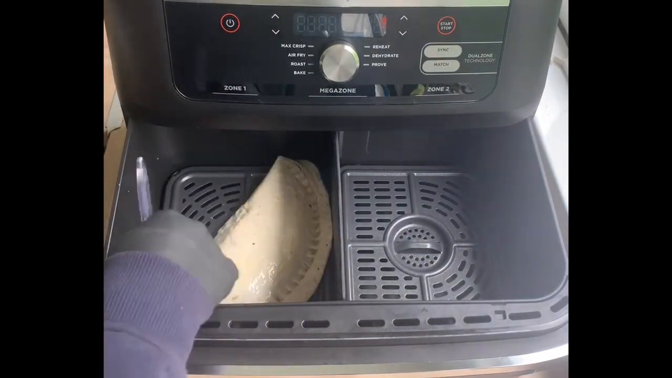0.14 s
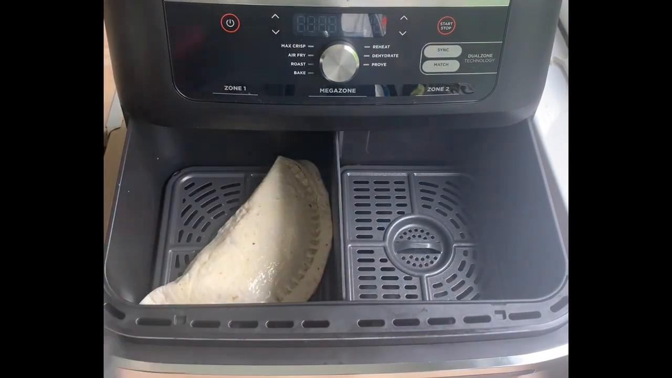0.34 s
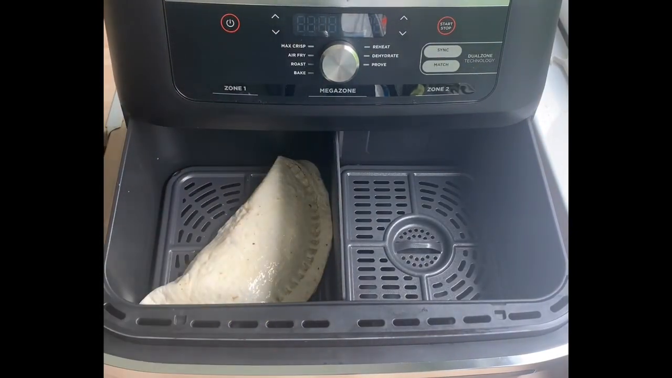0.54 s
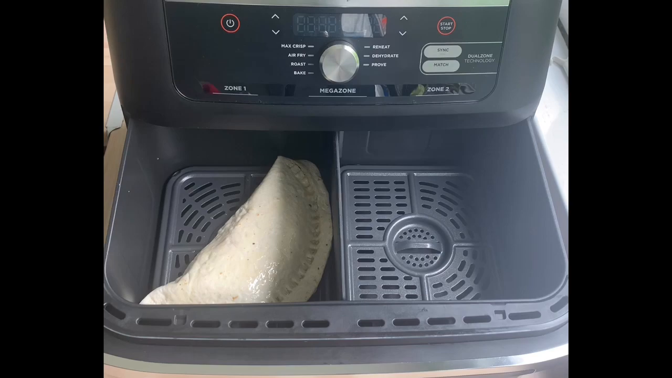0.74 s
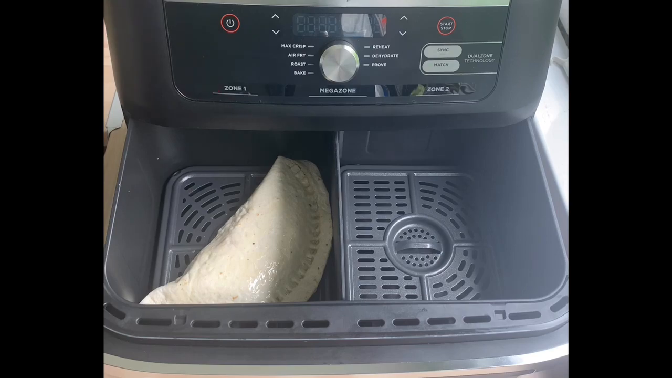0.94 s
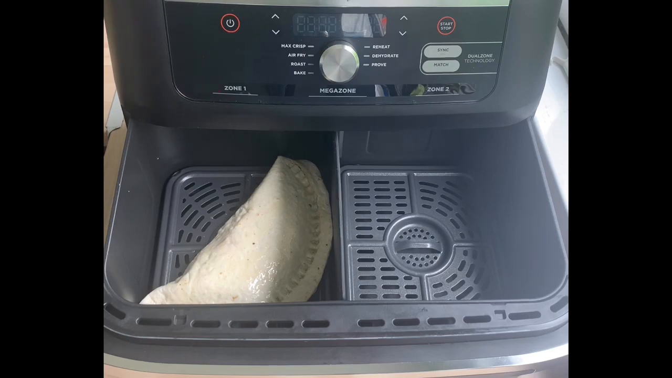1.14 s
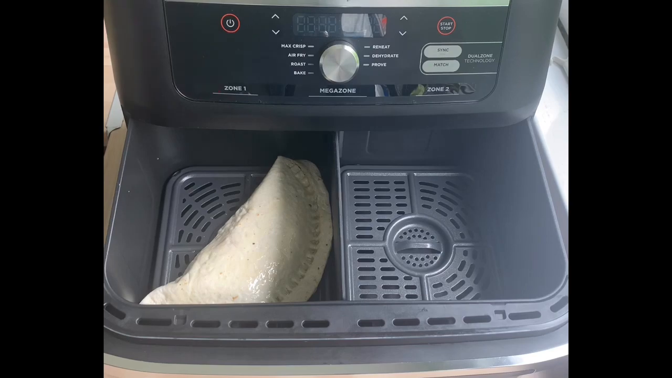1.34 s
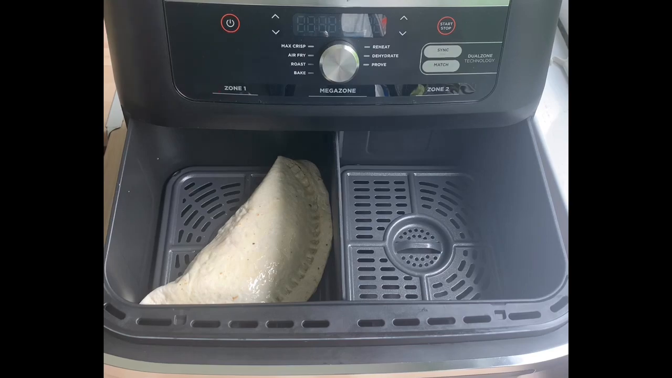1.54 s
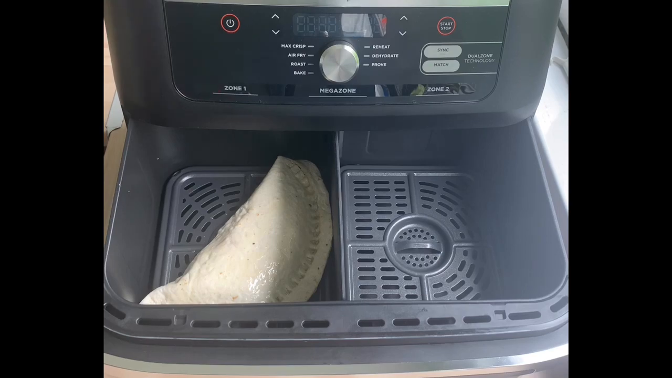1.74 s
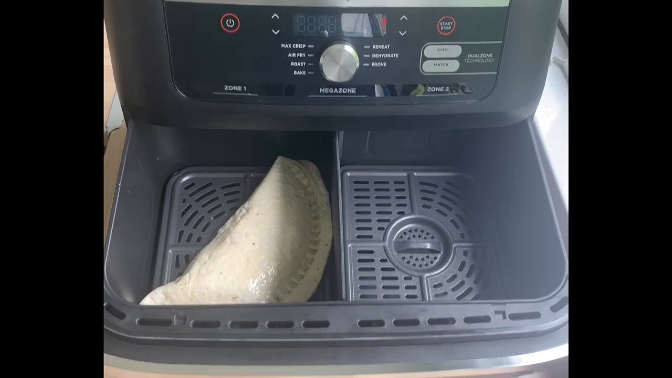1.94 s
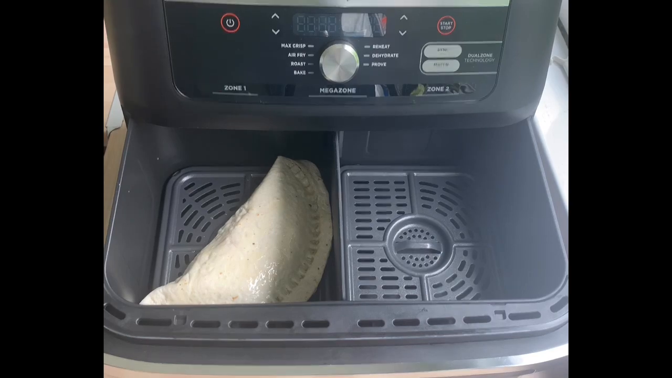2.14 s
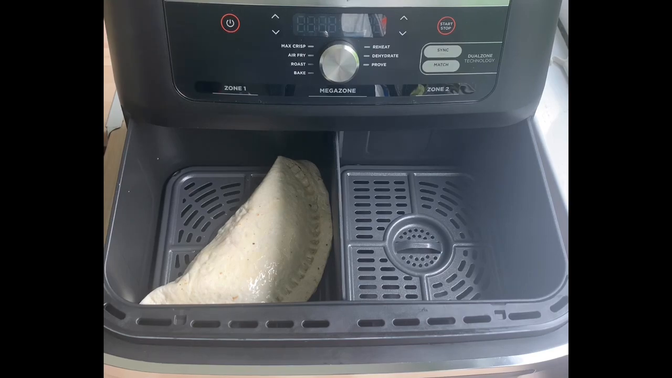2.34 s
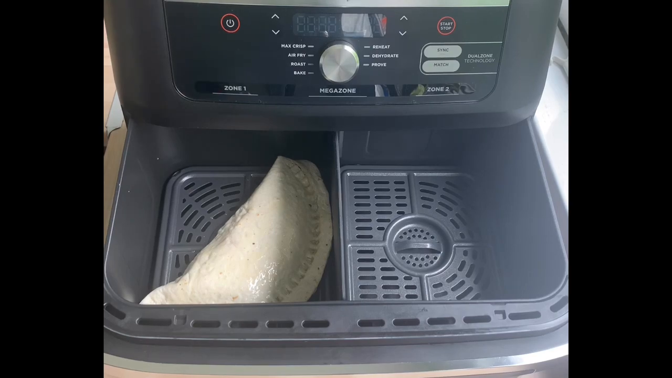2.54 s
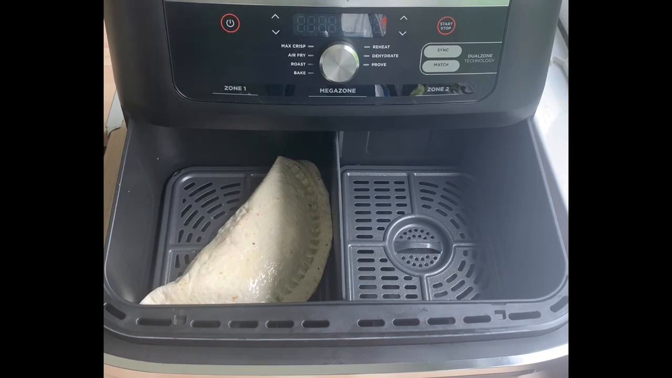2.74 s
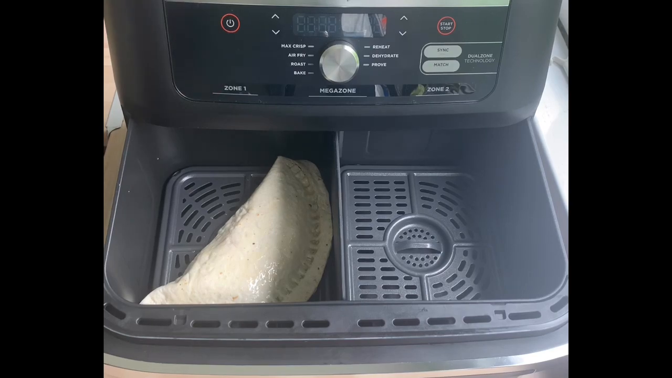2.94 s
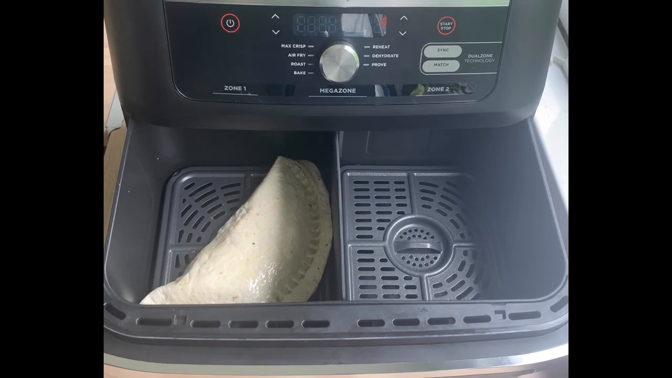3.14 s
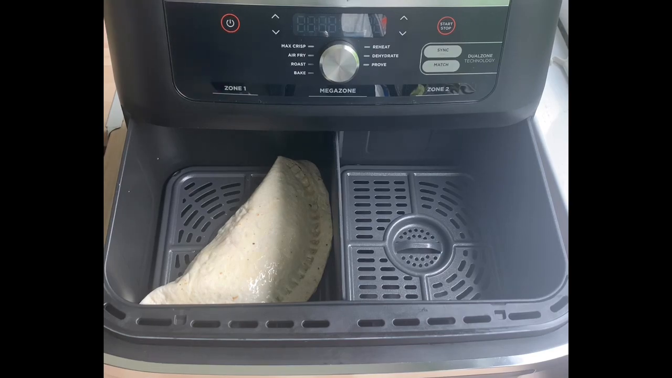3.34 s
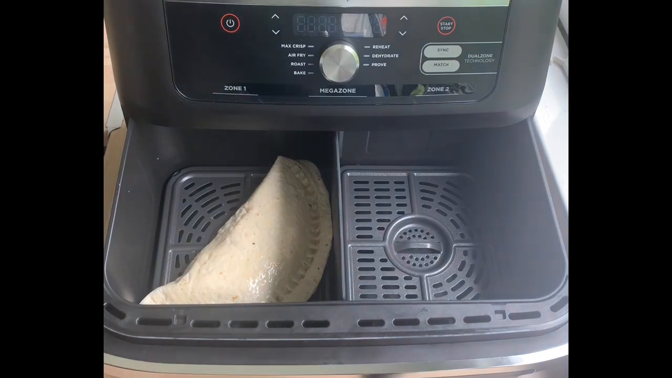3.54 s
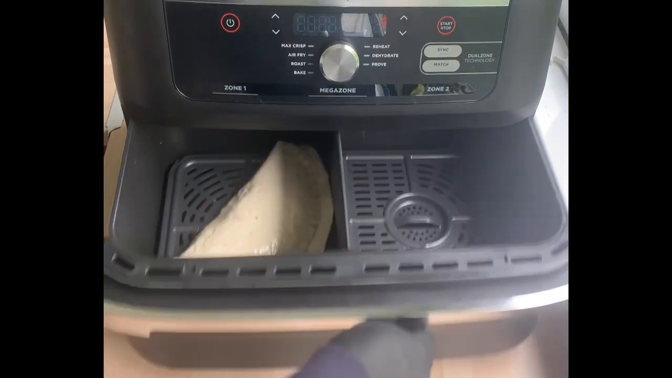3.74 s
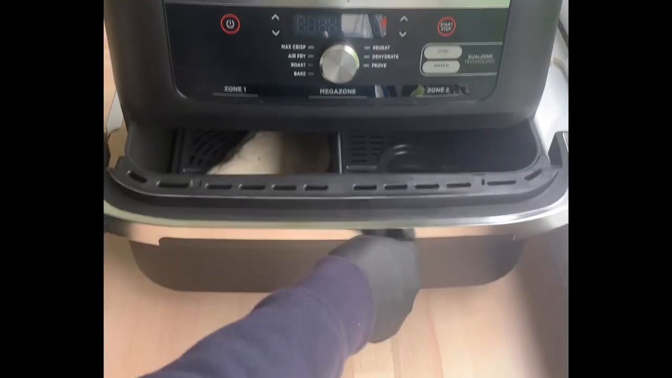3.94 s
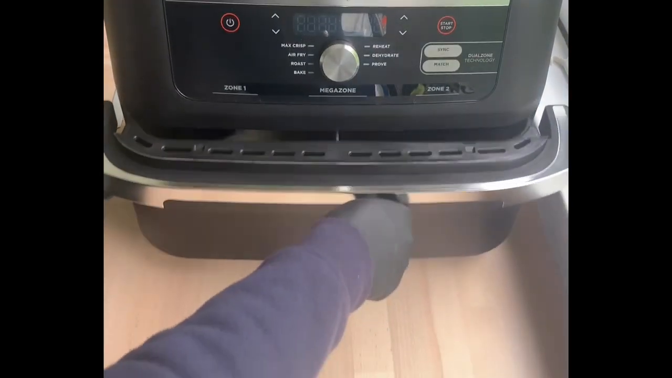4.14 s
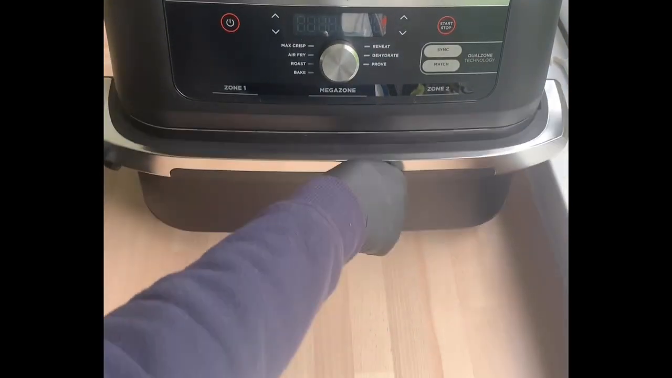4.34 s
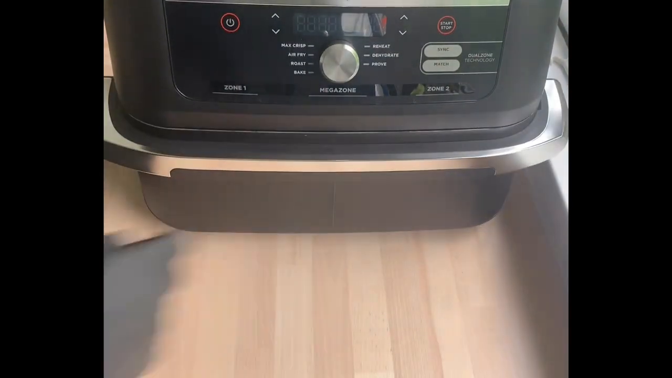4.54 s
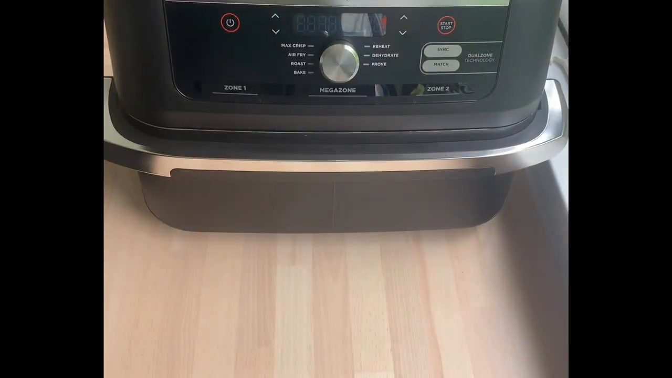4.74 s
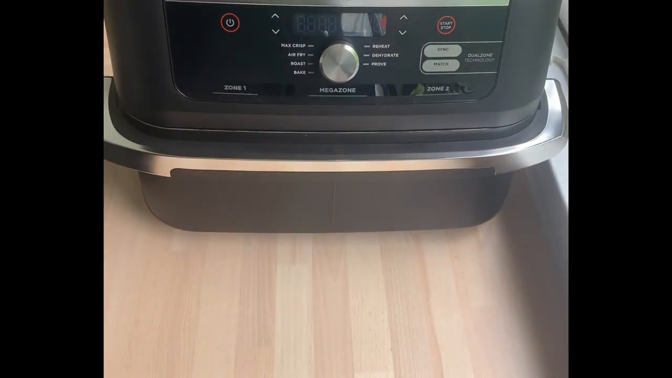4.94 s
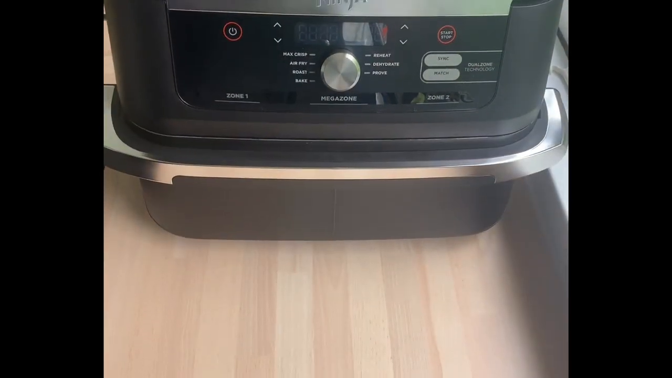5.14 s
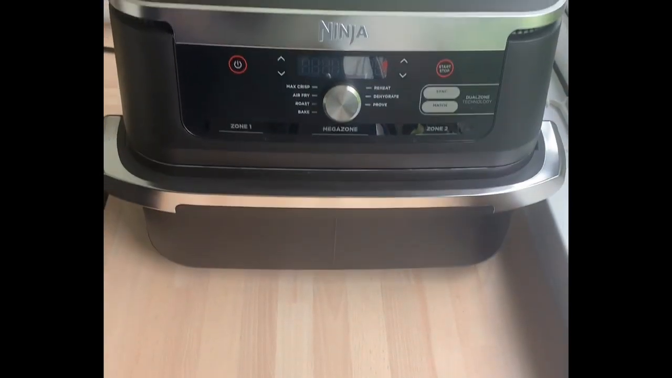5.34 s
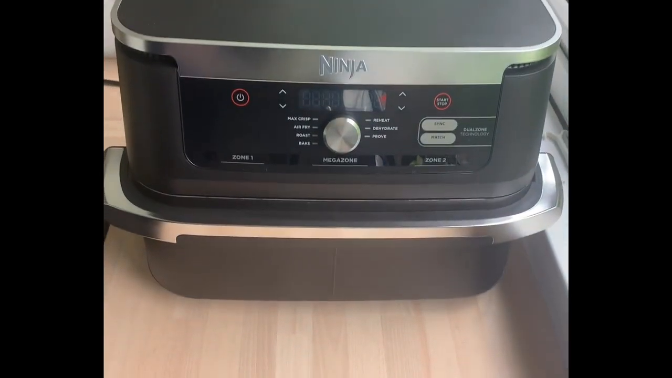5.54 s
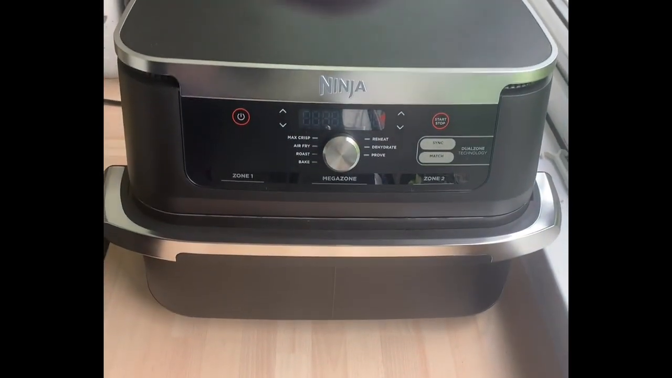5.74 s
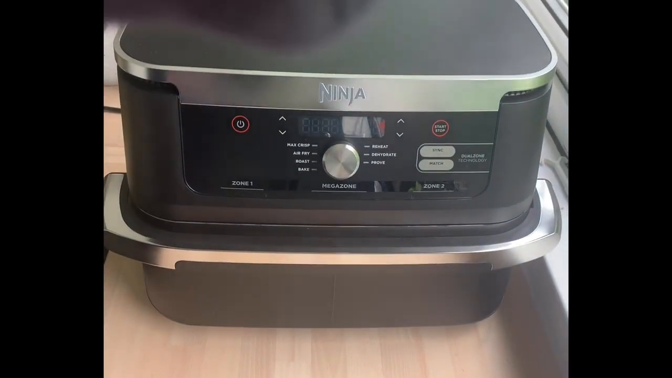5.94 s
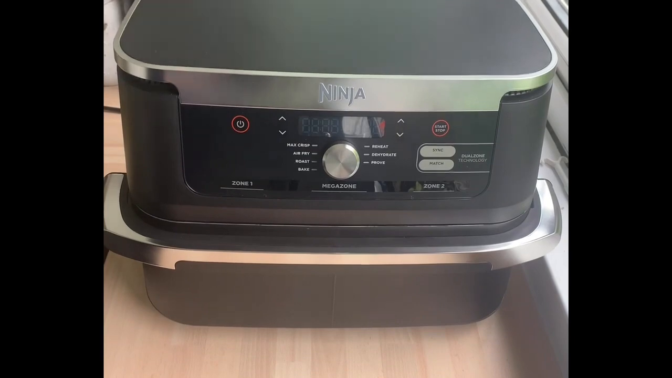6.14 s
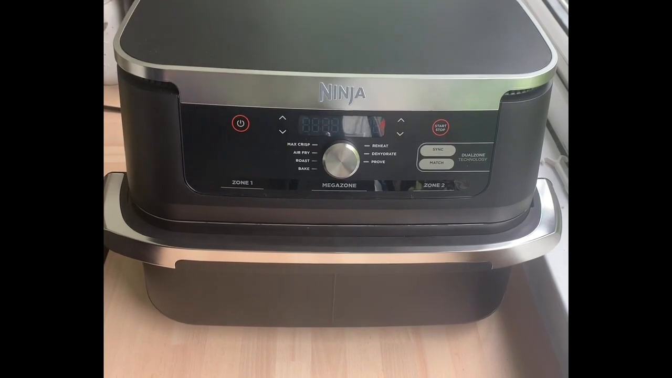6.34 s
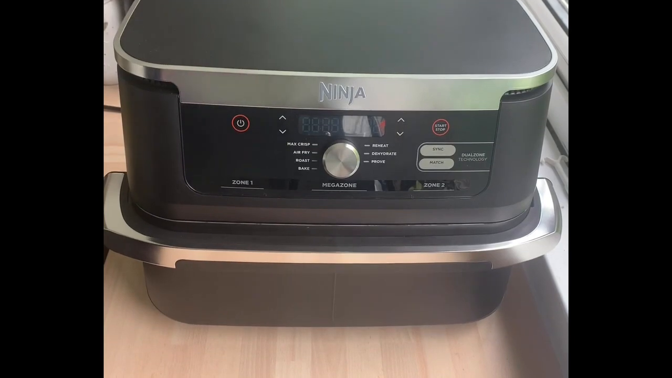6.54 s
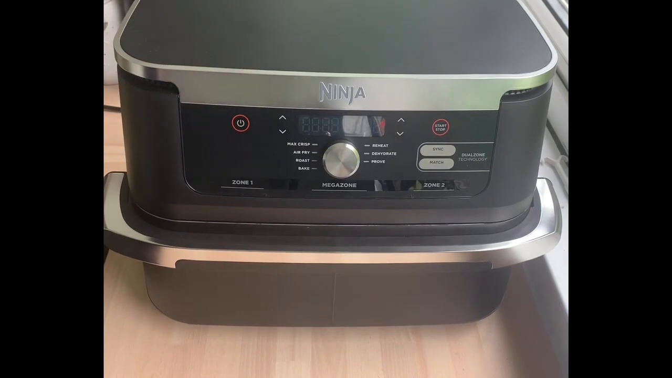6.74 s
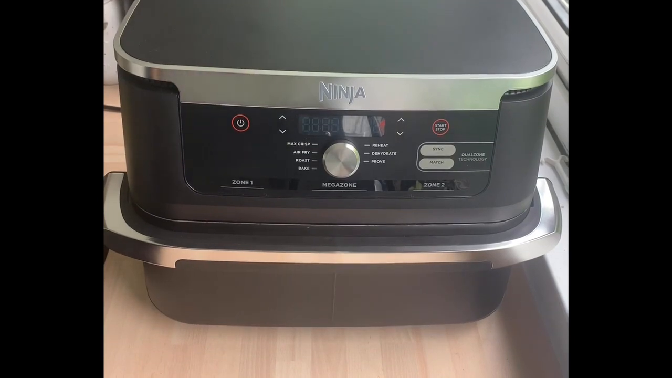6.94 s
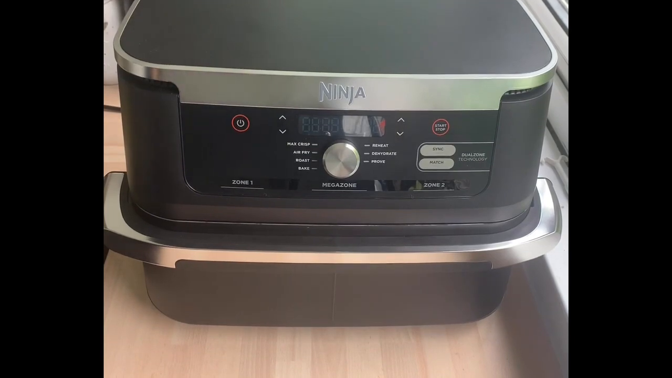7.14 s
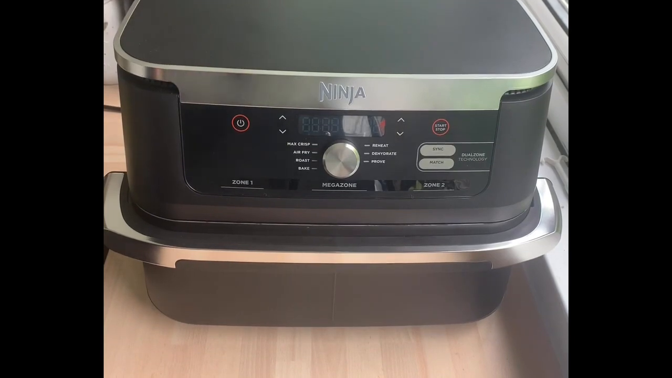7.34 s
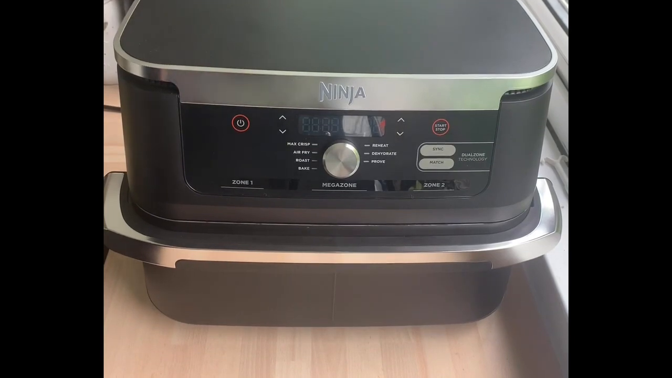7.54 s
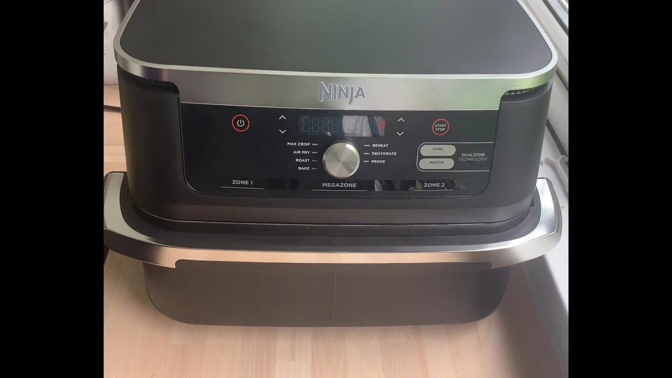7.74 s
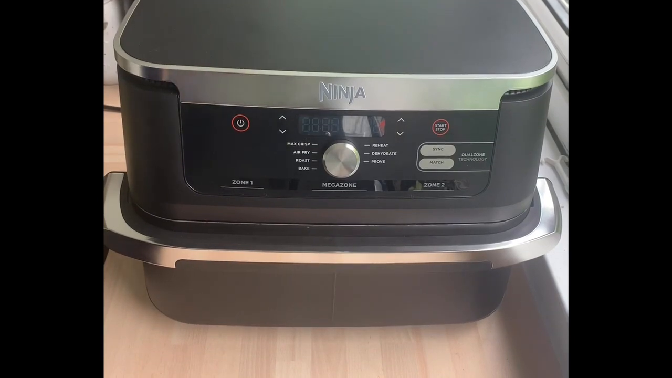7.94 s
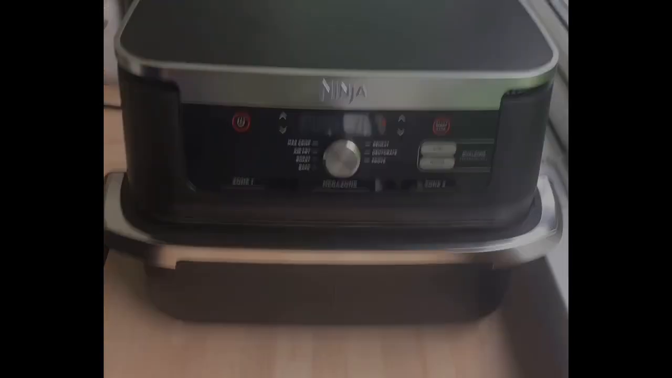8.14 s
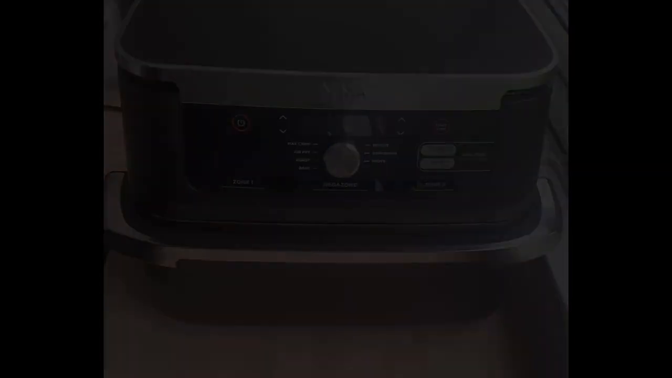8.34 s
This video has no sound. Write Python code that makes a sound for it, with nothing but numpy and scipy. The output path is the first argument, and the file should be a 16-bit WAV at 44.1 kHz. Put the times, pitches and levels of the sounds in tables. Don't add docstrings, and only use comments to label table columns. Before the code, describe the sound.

In a quiet humming kitchen, soft bristle hiss and jar clinks lead to a scraping drawer shutting with a crack, then small rustles and taps.

```python
import sys
import numpy as np
from scipy import signal
from scipy.fft import rfft, irfft, next_fast_len
from scipy.io import wavfile
from scipy.ndimage import uniform_filter1d, map_coordinates

SR = 44100
rng = np.random.default_rng(int(sys.argv[2]) if len(sys.argv) > 2 else 0)


def digitize_waveform(pressure):
    field = np.atleast_2d(pressure).T
    bounded = np.clip(field, -1, 1)
    quanta = np.round(bounded * 32767).astype(np.int16)
    wavfile.write(sys.argv[1], SR, quanta)


def gain_from_db(level_db):
    decades = np.asarray(level_db, float) / 20
    return 10 ** decades


N = 369999

# (time [s], level [dB])
HUM_LEVEL = [(0.0, -62), (0.96, -57.5), (1.19, -61), (1.85, -61), (2.08, -59), (2.94, -58), (3.23, -62.5),
             (3.67, -54), (3.86, -36), (4.02, -56), (4.62, -57.5), (5.73, -61.5), (5.89, -60.5),
             (6.92, -57.5), (7.24, -61.5), (7.83, -58.5), (8.39, -61)]
# (frequency [Hz], density [dB per Hz])
ROOM_SPECTRUM = [(20, -47), (40, -32.5), (80, -11), (140, -6), (250, -14.5), (530, -13.5), (900, -18),
                 (1300, -32.5), (2200, -28), (3000, -44), (4500, -38.5), (7000, -41), (11500, -47.5),
                 (14000, -80)]
# (frequency [Hz], width [Hz], level [dB])
ROOM_RESONANCES = [(94, 8.6, -14.5), (192.8, 21, -6), (309.7, 52, -2.5), (350, 15, -5.5), (602, 59, -15),
                   (9200, 150, -34)]
# (frequency [Hz], likeness [-1..1])
LEFT_RIGHT_LIKENESS = [(60, 1), (170, 0.44), (500, 0.25), (1460, -0.21), (4220, -0.12), (12200, -0.3)]
TONE_FLICKER_DB = 2.8
KITCHEN_DECAY_SCALE_S, WALL_CUT_HZ = 0.79, 12000

# (time [s], low hiss [dB], high hiss re low [dB], rise [s], fall [s])
BRUSH_STROKES = [(.304, -65.5, 2, 0.085, 0.064), (0.377, -55, 3.5, 0.038, 0.064),
                 (0.496, -60.5, 14, 0.065, 0.1), (0.793, -52, 3, 0.034, 0.045),
                 (0.888, -45.5, 0.4, 0.12, 0.058), (0.948, -46, 5.5, 0.02, 0.2),
                 (1.114, -49.5, 12.5, 0.029, 0.02), (1.361, -65.5, -6, 0.035, 0.021),
                 (1.49, -73.5, 0, 0.12, 0.35), (1.58, -61, -2, 0.057, 0.018),
                 (2.112, -58, 3.5, 0.018, 0.18), (2.381, -51, -6, 0.0051, 0.12),
                 (2.601, -70, 24.5, 0.037, 0.15), (2.641, -56.5, 15, 0.06, 0.024),
                 (2.778, -59.5, -10, 0.055, 0.058), (2.938, -67.5, -10, 0.37, 0.21)]
# (time [s], low hiss [dB], high hiss re low [dB], rise [s], fall [s])
RAIL_SCRAPES = [(3.436, -72, 12.5, 0.37, 0.28), (3.739, -46, -7, 0.12, .05), (3.758, -33.5, 10, .03, 0.061),
                (3.805, -37.5, 1.5, 0.051, 0.31), (3.847, -40.5, 0.2, .08, 0.28),
                (4.04, -55.5, -5.5, 0.17, 0.37), (4.192, -46, -0.96, 0.42, 0.077),
                (4.198, -45, -14, .02, 0.16), (4.268, -41, 2, 0.12, 0.14), (4.351, -30, 16.5, .006, 0.059),
                (4.372, -42.5, 9.5, .03, 0.088), (4.13, -53.5, -3, .2, .2)]
# (time [s], low hiss [dB], high hiss re low [dB], rise [s], fall [s])
CLOTH_RUSTLES = [(4.626, -71.5, 4, 0.25, 1), (4.935, -71.5, -19, 0.061, 0.21),
                 (5.083, -78, 18.5, 0.085, 0.031), (5.964, -80.5, 16, 0.062, 0.038),
                 (5.975, -48.5, -15.5, .016, 0.015), (6.534, -61.5, -9, 0.21, 0.055),
                 (6.85, -45, -9.5, 0.019, 0.1), (6.953, -50, -3, 0.022, 0.042),
                 (6.97, -59, 19, 0.022, 0.066), (7.33, -65, 7.5, 0.086, 0.29),
                 (7.44, -61, -17, .027, 0.016), (7.726, -85.5, 19, 0.16, 0.032),
                 (8.115, -62, 14.5, 0.0075, 0.047)]
# (frequency [Hz], level [dB], t60 [s])
RUBBED_MODES = [(1350, -8, .012), (1800, -9, .012), (2600, -6, 0.0076), (3540, -14.5, .01)]
RUB_APART = 0.6

# (time [s], peak [dB])
JAR_CLINKS = [
    (1.4786, -42.5),
    (1.594, -25.5),
    (1.9267, -15),
    (1.93, -11),
    (2.0113, -32),
]
# (frequency [Hz], level [dB], t60 [s])
GLASS_MODES = [(1366, 11.5, 0.24), (1900, 5, 0.1), (2660, 22.5, 0.12), (3100, 25.5, 0.13),
               (3863, 22, 0.065), (4140, 8, 0.1), (4940, 5, 0.08), (4940, 18, 0.04), (5720, 14, 0.16),
               (6500, 2, 0.22), (7000, -2, 0.058), (7400, 2, 0.21), (9100, -2, 0.16), (9600, -9.5, 0.06)]

# (time [s], peak [dB], centre [Hz], t60 [s], left-right [dB])
HANDLING_TICKS = [(0.3794, -45, 1930, 0.019, 10), (0.6784, -37, 2210, 0.018, 5.5),
                  (0.7811, -48, 4340, 0.051, 8), (0.9522, -25, 5000, 0.016, 6.5),
                  (0.968, -32.5, 2650, .025, 18), (1.016, -34, 3050, .04, 2), (1.132, -36, 3000, .02, 0),
                  (1.1124, -32, 2220, 0.015, -18), (1.5958, -56, 3110, 0.11, 16),
                  (1.8764, -55.5, 2340, 0.04, 21), (1.93, -32.5, 3835, 0.05, -33),
                  (2.0901, -34, 2750, 0.027, 0), (2.381, -37, 1900, 0.16, 5),
                  (2.4294, -50, 1800, 0.035, 14), (4.93, -46.5, 1274, 0.18, 1), (5.06, -55, 1306, .2, 0),
                  (5.08, -44.5, 975, 0.12, 6), (5.092, -53, 1700, 0.055, -2), (5.137, -56, 1060, 0.069, -4),
                  (5.191, -62, 903, .08, -3), (5.9559, -53, 9480, 0.12, -14),
                  (5.9743, -50, 2560, 0.015, 32), (6.8483, -49, 2533, 0.12, 30),
                  (6.9516, -35, 6010, 0.13, -12), (7.2664, -53.5, 6060, 0.12, 3),
                  (7.3168, -60.5, 8470, 0.12, 21.5), (7.4385, -40, 1974, 0.047, 1),
                  (7.7288, -76, 2780, 0.065, 14), (8.1174, -39.5, 1940, 0.049, 1)]
# (time [s], peak [dB], centre [Hz], t60 [s], left-right [dB])
RAIL_LATCH_TICKS = [(3.7561, -25, 1604, 0.15, -7), (3.8024, -30, 1797, 0.082, -19),
                    (3.851, -31, 1209, 0.043, -4), (3.931, -28, 3030, 0.027, 0),
                    (3.9244, -31, 2060, 0.04, 9), (4.199, -25, 2500, 0.096, -8.5),
                    (4.236, -32.5, 2970, 0.056, -2), (4.253, -21.5, 2740, 0.043, 4.5),
                    (4.2622, -15, 2695, 0.039, -0.5), (4.349, -17, 6870, 0.12, -6),
                    (4.3676, -31, 1797, 0.13, -20.5)]
CRACK_SHARE, CRACK_PER_OCTAVE = 0.19, 0.066

# (time [s], peak [dB], strongest body mode [Hz], panels [dB], boom [dB])
PUT_DOWNS = [(0.404, -53, 144, -26, 2), (0.888, -39.5, 308, -21.5, -13), (0.951, -63, 312, 1, 13),
             (1.48, -47.5, 333, -20, -36), (1.595, -31.5, 267, -21, -14.5), (1.75, -47.5, 313, -37, -33),
             (1.876, -47, 225, -15, -9), (1.922, -31.5, 229, -17.5, -9.5), (2.119, -30.5, 334, -14, -10),
             (2.136, -30.5, 139, -21.5, -12.5), (2.289, -50.5, 205, -9.5, -18),
             (2.374, -37.5, 433, -5.5, -15), (2.399, -50.5, 517, 7, -6), (2.426, -35.5, 300, -9.5, -22),
             (3.104, -43, 156.5, -24, -29)]
# (time [s], peak [dB], strongest body mode [Hz], panels [dB], boom [dB])
DRAWER_BUMPS = [(3.599, -67, 322, -5, -8), (3.634, -47, 404, -2, -4.5), (3.659, -36.5, 280, -21, -4),
                (3.756, -12.5, 477, -6, -27), (3.804, -14, 387, -8, -14), (3.851, -23.5, 363, -8, -21),
                (3.848, -23.5, 600, -11, -27), (3.866, -24.5, 600, -12, -28), (3.88, -19, 457, -40, -17),
                (3.917, -10, 470, -18.5, -19.5), (4.207, -18, 274, -9, -26.5),
                (4.226, -13, 310, -15.5, -17.5), (4.251, -14.5, 294, -5, -21.5),
                (4.274, -16, 193, -5.5, -18.5), (4.367, -5.5, 325, -15, -31), (4.386, -20, 595, -20, -30),
                (4.368, -9, 500, -23, -30), (4.372, -15, 200, -31, -25), (4.393, -16, 298.6, -16.5, -25),
                (4.419, -30, 345, -10, -29), (4.515, -33.5, 330, -45, -15.5), (4.628, -44, 275, -11.5, -35)]
# (time [s], peak [dB], strongest body mode [Hz], panels [dB], boom [dB])
LATER_TAPS = [
    (4.926, -38.5, 430, -1, -13),
    (5.137, -50.5, 170, -1, -25),
    (5.191, -50, 323, -9.5, -6.5),
    (5.856, -44.5, 355, -15, -6.5),
    (5.974, -30, 411, 1, -16),
    (6.85, -45, 165.6, -4, -5),
    (6.889, -57, 143, -5, 9.5),
    (8.129, -40, 295.6, -5, -17),
    (8.154, -34.5, 190, -15, -10.5),
    (8.19, -61, 142, -18, 3),
]
# (frequency [Hz], level [dB], t60 [s])
BODY_MODES = [(170, -12, 0.11), (200, -4.5, 0.11), (250.6, -2.5, 0.15), (298.5, -10.5, 0.11),
              (316.2, 6, 0.045), (354.8, 4, 0.13), (377, -2, 0.14), (424.6, 4, 0.077), (449, -0.5, .07),
              (505, 0, .035), (595, -4, .06)]
# (frequency [Hz], level [dB], t60 [s])
PANEL_MODES = [(524, -6.5, 0.02), (598.7, 1.5, 0.041), (687, -7, 0.05), (777, -1.5, 0.054),
               (833, -5, 0.046), (957, -7.5, 0.039), (1200, -2, 0.011), (1380, -3.5, 0.013),
               (1797, -7, 0.024)]
# (frequency [Hz], level [dB], t60 [s])
BOOM_MODES = [(97.3, -10.5, 1), (108.6, 2, 0.43), (125, 2.5, 0.11)]
WORKTOP_PANEL_HZ, DRAWER_PANEL_HZ, TAP_PANEL_HZ = 616, 758, 1100
WORKTOP_DAMPING, DRAWER_DAMPING, TAP_DAMPING = 0.52, 0.76, 1.64
FIRST_TOUCH_S, FIRST_TOUCH_DB = 0.004, -15.5
PANELS_LATE_S, CHATTER_S = 0.002, 0.007
MODE_LUCK_DB, MODE_WANDER = 3.5, 0.03

# (time [s], push on the housing [dB], load on the rails [dB])
DRAWER_SLIDE = [(3.5, -81, -77), (3.69, -52, -57.5), (3.75, -53.5, -51), (3.79, -42.5, -42.5),
                (3.87, -33.5, -46.5), (3.91, -29.5, -50.5), (3.96, -38, -49.5), (4.02, -49.5, -63.5),
                (4.12, -50.5, -58), (4.19, -53, -61), (4.215, -33.5, -46), (4.285, -32.5, -42.5),
                (4.31, -46.5, -54.5), (4.36, -49.5, -46.5), (4.39, -35, -45), (4.42, -42, -55.5),
                (4.49, -50, -78.5), (5.4, -73, -83)]
FULL_LOAD_DB, PANELS_DB, BOOM_DB = -38, -35, -40
PANELS_FOLLOW, BOOM_FOLLOWS = 1.15, 0.8

# (time [s], left side hears it later by [ms])
LEFT_DELAY = [(0, -0.14), (3.2, -0.12), (4.5, -0.27), (4.6, 0.2), (6.2, 0.21), (6.6, -0.16), (7.8, -.15),
              (8.0, 0.15), (8.4, 0.17)]
# (frequency [Hz], lead [rad])
DRAWER_PHASE_LEAD = [(0, -3.5), (1810, -1.65), (2840, 7.5), (3790, 4.5), (4310, -0.5), (4820, 0.9),
                     (5860, -10), (6460, 0), (7060, 5.5), (8870, 4.5), (9470, 8), (10100, 5), (12000, 1.2),
                     (12400, -1.7)]
DRAWER_MOVES_S = (3.3, 4.55)
PANELS_ASIDE = 0.11
LOUD_FRAME = 30


def rms_one(x):
    return x / np.sqrt(np.mean(x ** 2) + 1e-20)


def in_time(rows, off=None):
    s, first, *rest = np.transpose(rows)
    t = np.arange(N) / SR
    return [np.interp(t, s, first, off, off)] + [np.interp(t, s, column) for column in rest]


def at_hz(points, hz):
    table_hz, values = np.transpose(points)
    return np.interp(np.log(hz), np.log(table_hz), values)


def band(x, low_hz, high_hz):
    edges = [low_hz, min(high_hz, 0.45 * SR)]
    return signal.sosfilt(signal.butter(2, edges, "band", fs=SR, output="sos"), x)


def high_pass(x, order, hz):
    return signal.sosfilt(signal.butter(order, hz, "high", fs=SR, output="sos"), x)


def drift(rate_hz):
    r = np.exp(-80 * np.pi * rate_hz / SR)
    slow = signal.lfilter([1], [1, -2 * r, r * r], rng.standard_normal(N // 40 + 2002))[2000:]
    return np.interp(np.arange(N) / 40, np.arange(len(slow)), rms_one(slow))


def ring(clicks, hz, t60):
    r, w = gain_from_db(-60 / (t60 * SR)), 2 * np.pi * hz / SR
    return signal.lfilter([0, np.sin(w)], [1, -2 * r * np.cos(w), r * r], clicks + 1e-18)


def grains(per_s, spread_db):
    sizes = gain_from_db(spread_db * np.minimum(rng.exponential(1, N), 5)) * rng.choice([-1, 1], N)
    return sizes * (rng.random(N) < per_s / SR)


def add(out, s, piece):
    i = round(s * SR)
    out[..., i:i + piece.shape[-1]] += piece[..., :N - i]


def room_tone():
    out, together = 0, drift(5.7)
    edges = 25 * 2 ** np.arange(0, 9.1, 0.5)
    white = rng.standard_normal((2, 2, N))
    for k, (low, high) in enumerate(zip(edges, edges[1:])):
        mid, side = band(white[k % 2], low, high)
        hz = np.sqrt(low * high)
        alike = np.clip(at_hz(LEFT_RIGHT_LIKENESS, hz), -1, 1)
        gain = gain_from_db(at_hz(ROOM_SPECTRUM, hz) + 2.4 * together + TONE_FLICKER_DB * drift(8.1))
        out = out + gain * (np.sqrt(1 + alike) * mid + np.sqrt(1 - alike) * side * [[1], [-1]])
    out = rms_one(out)
    for hz, width_hz, db in ROOM_RESONANCES:
        mode = rms_one(ring(rng.standard_normal(N), hz, 6.3 / width_hz))
        out = out + gain_from_db(db + 2.5 * drift(4.7)) * mode
    return gain_from_db(in_time(HUM_LEVEL)[0] - 3.5) * out


def kitchen(x):
    size = next_fast_len(N + SR)
    hz = np.arange(size // 2 + 1) * SR / size
    spectrum, out = rfft(x, size), []
    for lags_s in rng.uniform(0.0079, 0.027, (2, 6)):
        echoes = 0
        for k, lag in enumerate(lags_s):
            loss = gain_from_db(-60 * lag / KITCHEN_DECAY_SCALE_S * (7.5 + hz / WALL_CUT_HZ))
            loop = loss * np.exp(-2j * np.pi * hz * lag)
            echoes = echoes + loop / (1 - loop) * (-1) ** k
        out.append(irfft(spectrum * echoes, size)[:N])
    return np.array(out)


def rubs():
    low_db, high_db = np.full((2, N), -120.)
    t = np.arange(N) / SR
    for s, peak_db, bright_db, rise_s, fall_s in BRUSH_STROKES + RAIL_SCRAPES + CLOTH_RUSTLES:
        level_db = peak_db - 30 * np.maximum((s - t) / rise_s, (t - s) / fall_s)
        low_db = np.maximum(low_db, level_db)
        high_db = np.maximum(high_db, level_db + bright_db)
    slips = grains(7000, spread_db=3) * gain_from_db(2.0 * drift(40))
    crackle = rms_one(grains(1200, spread_db=3.2) * gain_from_db(2.5 * drift(30)))
    slips = rms_one(slips) + RUB_APART * rng.standard_normal(N) * [[1], [-1]]
    grit = slips + 0.7 * crackle
    tones = sum(gain_from_db(db + 4.0 * drift(15)) * rms_one(ring(grit, hz, t60)) for hz, db, t60 in RUBBED_MODES)
    low = rms_one(rms_one(band(grit, 1250, 4600)) + tones)
    high = rms_one(band(slips + 0.13 * crackle, 1800, 22000))
    return low * gain_from_db(low_db - 3.5) + high * gain_from_db(high_db - 6.5)


def clinks():
    out = np.zeros(N)
    for s, peak_db in JAR_CLINKS:
        chatter = rng.standard_normal(400) * gain_from_db(-60 * np.arange(400) / SR / 0.006)
        push = np.pad(chatter, (0, SR // 4))
        x = 0
        for hz, db, t60 in GLASS_MODES:
            partial = ring(push, hz, 0.75 * t60)
            partial = partial + 0.7 * ring(push, 1.017 * hz, 0.6 * t60)
            partial = partial + 0.5 * ring(push, 0.97 * hz, 0.5 * t60)
            x = x + gain_from_db(db + 2 * rng.standard_normal()) * partial
        add(out, s, gain_from_db(peak_db - 14.0) * x / np.abs(x).max())
    return out


def ticks():
    out, t = np.zeros((2, N)), np.arange(SR // 5) / SR
    for s, peak_db, hz, t60, pan_db in HANDLING_TICKS + RAIL_LATCH_TICKS:
        u, v, w = rng.standard_normal((3, 90, 1))
        fade = gain_from_db(-60 * t / max(t60, 0.02))
        broad = max(CRACK_SHARE + CRACK_PER_OCTAVE * np.log2(hz / 2000), 0.1)
        crack = rms_one(band(rng.standard_normal(len(t)), 1300, 2.6 * hz))
        crack = crack * (gain_from_db(-60 * t / 0.035) + 1.2 * fade)
        pitch_hz = np.clip(hz * 2 ** (0.32 * u), 700, 12000)
        swarm = rms_one(np.sum(gain_from_db(3 * v) * np.sin(2 * np.pi * pitch_hz * t + 9 * w), axis=0))
        rough = 1 + 0.9 * rms_one(band(rng.standard_normal(len(t)), 60, 500))
        swarm = swarm * rough * fade * (1 - np.exp(-t / 0.00031))
        pan = gain_from_db(np.array([[0.5], [-0.5]]) * pan_db)
        add(out, s, gain_from_db(peak_db - 15.5) * (broad * crack + 1.15 * swarm) * pan)
    return out


def struck(modes, luck_db, contact_ms, centre_hz, damping, spill):
    push = np.zeros(SR // 4)
    width = max(int(contact_ms * SR / 1000), 3)
    push[:width] = -0.35 * np.hanning(width)
    push[width:2 * width] = np.hanning(width)
    x = 0
    for (hz, db, t60), u in zip(modes, luck_db):
        mode_hz = hz * (1 + MODE_WANDER * np.sin(7 * u))
        x = x + gain_from_db(db + u) * ring(push, mode_hz, t60 / damping)
    x = band(x, centre_hz / 1.24, centre_hz * 1.22) + spill * x
    return x / np.abs(x).max()


def knocks():
    body, panels = np.zeros(N), np.zeros(N)
    for rows, panel_hz, damping in [(PUT_DOWNS, WORKTOP_PANEL_HZ, WORKTOP_DAMPING),
                                    (DRAWER_BUMPS, DRAWER_PANEL_HZ, DRAWER_DAMPING),
                                    (LATER_TAPS, TAP_PANEL_HZ, TAP_DAMPING)]:
        for s, peak_db, body_hz, panel_db, boom_db in rows:
            u = rng.standard_normal(24)
            luck_db = MODE_LUCK_DB * u
            thud = struck(BODY_MODES, luck_db, 1.444, body_hz, damping=1.4 * damping ** 0.5, spill=0.37)
            thud = gain_from_db(peak_db - 3.0) * thud
            add(body, s, thud)
            add(body, s - FIRST_TOUCH_S, gain_from_db(FIRST_TOUCH_DB) * thud)
            boom = struck(BOOM_MODES, luck_db[9:], 3.9, 130, damping=0.97, spill=0.046)
            add(body, s, gain_from_db(peak_db + boom_db) * boom)
            blow = struck(PANEL_MODES, luck_db[12:], 0.42, panel_hz, damping=damping, spill=1.0)
            blow = gain_from_db(peak_db + panel_db) * blow
            add(panels, s - FIRST_TOUCH_S, gain_from_db(FIRST_TOUCH_DB) * blow)
            for k in range(4):
                touch_s = s + PANELS_LATE_S + k * CHATTER_S * 1.5 ** u[k]
                add(panels, touch_s, blow * gain_from_db(-5.5 * k * damping) * np.sign(u[k + 4]))
    return body, panels


def shake(modes, per_s):
    return rms_one(sum(gain_from_db(db) * ring(grains(per_s, spread_db=2.5), hz, 1.9 * t60) for hz, db, t60 in modes))


def slide():
    body_db, load_db = in_time(DRAWER_SLIDE, off=-120)
    on, load_db = body_db > -110, load_db - FULL_LOAD_DB
    rumble = gain_from_db(body_db) * shake(BODY_MODES, 720)
    rumble = rumble + on * gain_from_db(BOOM_DB + BOOM_FOLLOWS * load_db) * shake(BOOM_MODES, 300)
    rattle = on * gain_from_db(PANELS_DB + PANELS_FOLLOW * load_db) * shake(PANEL_MODES, 1300)
    return rumble, rattle


def two_ports(x):
    late = np.arange(N) - in_time(LEFT_DELAY)[0] * SR / 1000
    left = map_coordinates(x[0], [late], order=3, mode="nearest")
    a, b = (round(s * SR) for s in DRAWER_MOVES_S)
    hz = np.arange((b - a) // 2 + 1) * SR / (b - a)
    lead = np.interp(hz, *np.transpose(DRAWER_PHASE_LEAD))
    left[a:b] = irfft(rfft(x[0, a:b]) * np.exp(1j * lead), b - a)
    return np.array([left, x[1]])


def scene():
    body, panels = knocks()
    rumble, rattle = slide()
    thin_walls = panels + rattle
    low = high_pass(body + rumble + 1.64 * thin_walls, 4, 85)
    bright = rubs() + clinks() + ticks() + 0.5 * thin_walls
    wet = gain_from_db(-18.5) * kitchen(low) + gain_from_db(-4.5) * kitchen(bright.mean(axis=0))
    aside = PANELS_ASIDE * (np.roll(low, shift=8) - np.roll(low, shift=-8)) * [[1], [-1]]
    direct = low * gain_from_db(np.array([[-0.6], [0.6]])) + two_ports(bright)
    return direct + aside + wet + room_tone()


def patchy_treble(x):
    hz, _, frames = signal.stft(x, SR, nperseg=1024)
    field = uniform_filter1d(rng.standard_normal((80, frames.shape[-1])), size=7)
    field = rms_one(field)[(hz // 380).astype(int)]
    treble = np.abs(frames[0, hz > 5000]).mean(axis=0)
    loud = treble > LOUD_FRAME * np.median(treble)
    easy = 0.6 * np.exp(-np.log2((hz[:, None] + 1) / 6300) ** 2 / 0.3) - 1.35 - 2 * loud
    gain_db = np.where(field < easy, -35, 3.0 * field) * np.clip((hz[:, None] - 2200) / 700, 0, 1)
    return signal.istft(frames * gain_from_db(gain_db), SR, nperseg=1024)[1][:, :N]


def top_cut(x):
    return signal.sosfilt(signal.butter(12, 12810, fs=SR, output="sos"), x)


def record(dry):
    thin = high_pass(dry, 2, 45)
    patchy = patchy_treble(thin + 0.09 * band(thin, 18000, 27000))
    cut = signal.sosfilt(signal.ellip(8, 0.5, 32, 11950, fs=SR, output="sos"), patchy)
    return top_cut(cut)


dry = scene()
out = record(dry)
digitize_waveform(out)
```